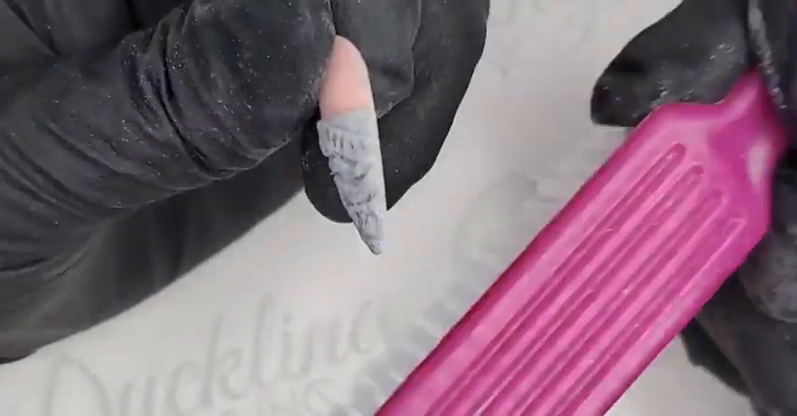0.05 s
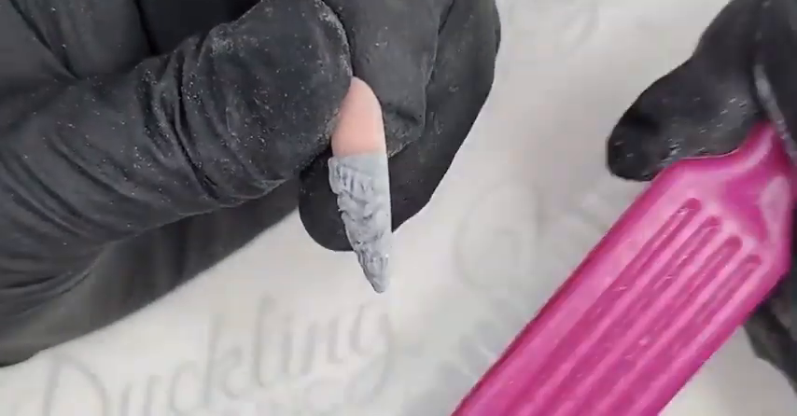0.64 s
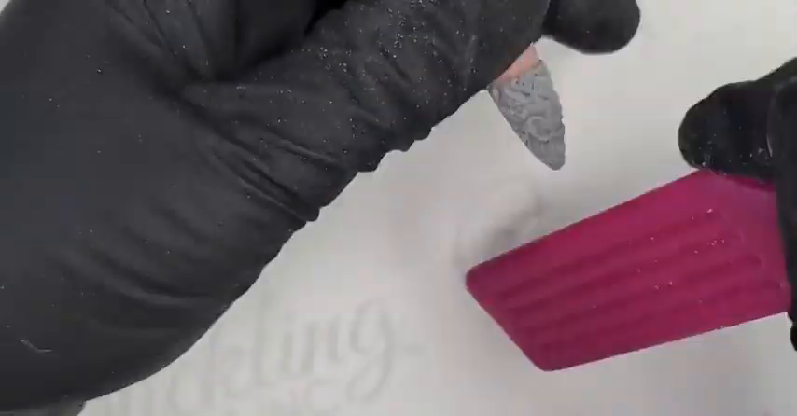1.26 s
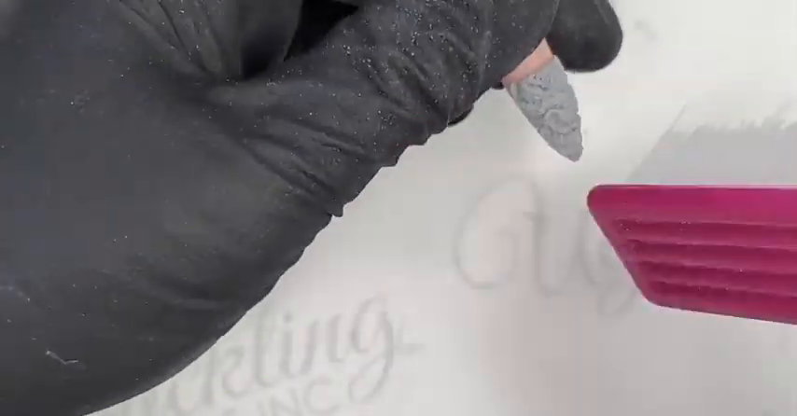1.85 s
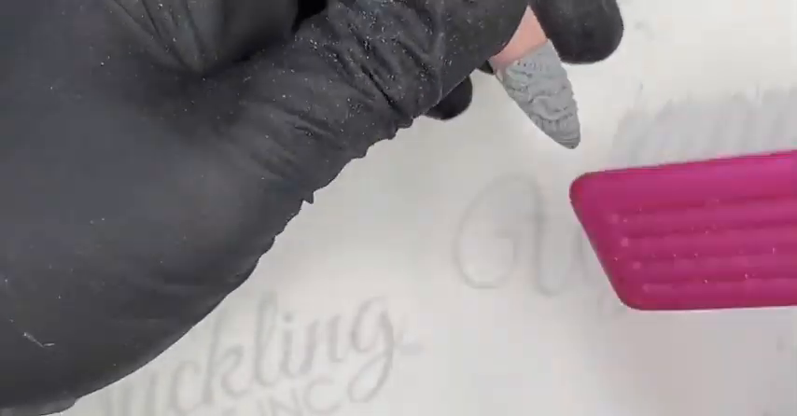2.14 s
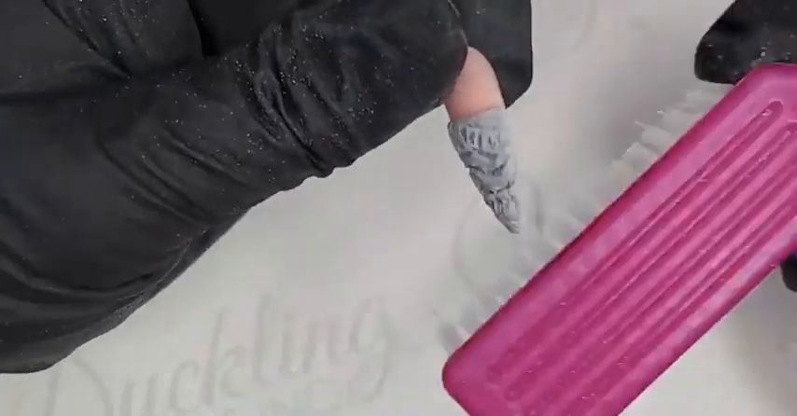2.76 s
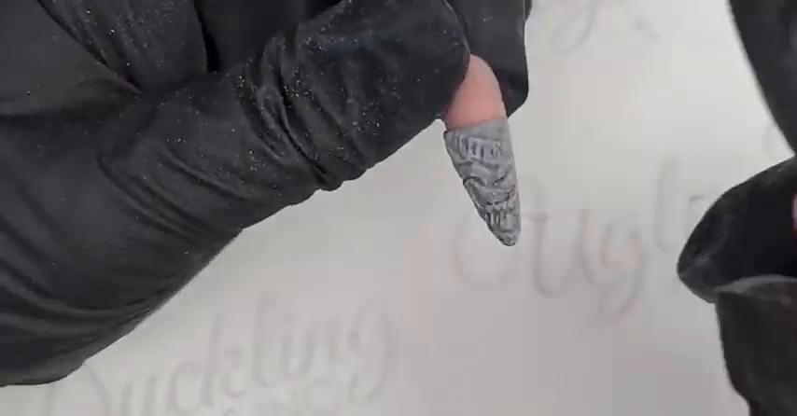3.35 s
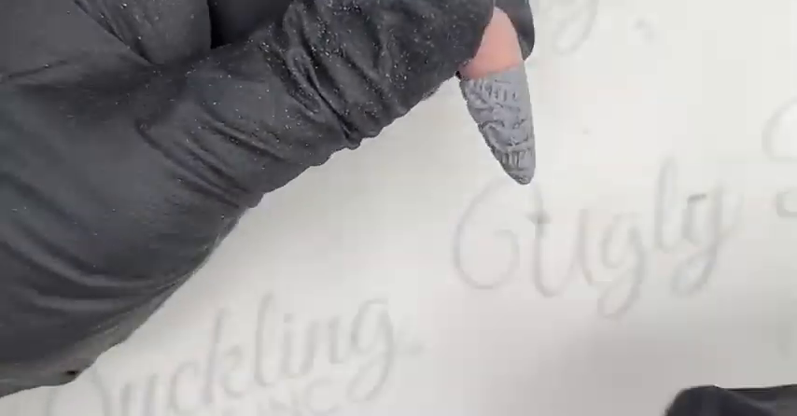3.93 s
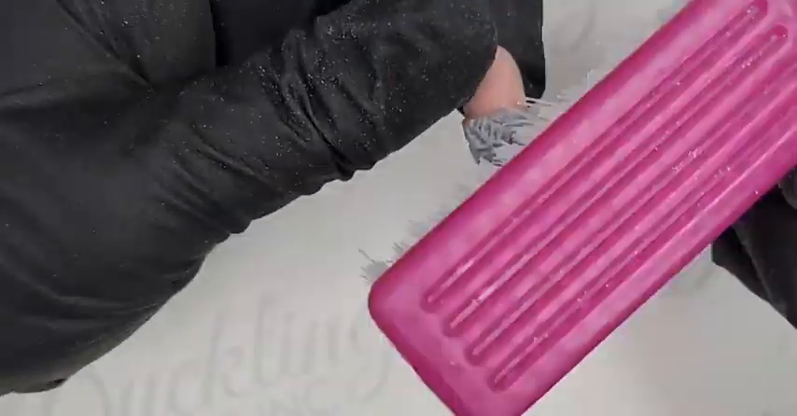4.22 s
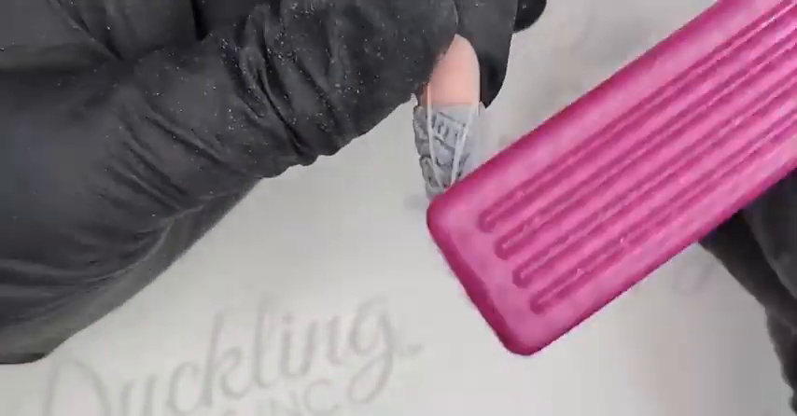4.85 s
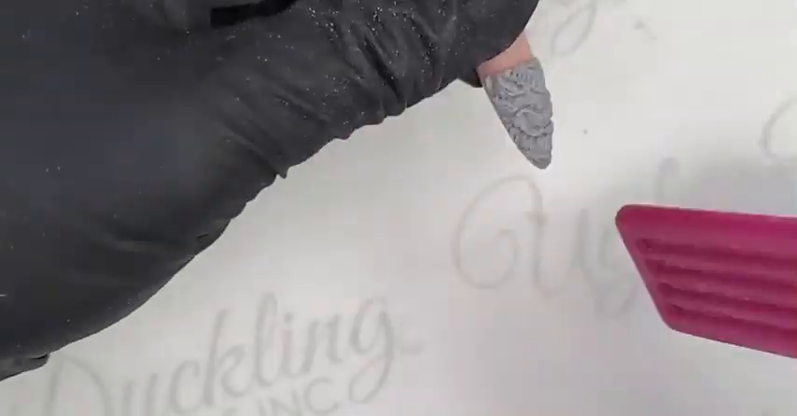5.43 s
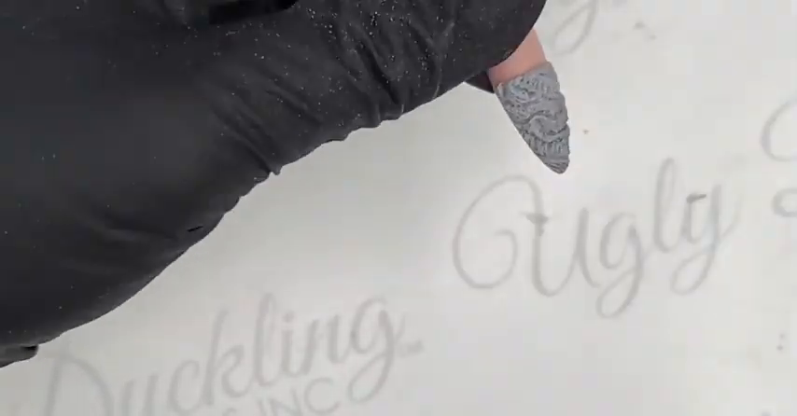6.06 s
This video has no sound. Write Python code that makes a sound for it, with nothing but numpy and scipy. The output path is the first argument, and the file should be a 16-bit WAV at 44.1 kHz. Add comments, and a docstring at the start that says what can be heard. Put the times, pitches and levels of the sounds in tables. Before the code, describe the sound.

A small plastic brush sweeps dust off a nail, close to the microphone in a small room. From the start, short dry swishes come about four a second, each a hiss that swells into a scrape and flicks off. The first few are scratchier, with sharp bristle clicks near 0.6 and 0.9 seconds. From 1.3 to 3 seconds the strokes are thinner and hissier, ending with another click. The brushing then pauses: a rubber glove slips on the handle at about 3.2 seconds, then rubs and crinkles with small pops around 4 seconds. The swishes resume at 4.3 seconds, strongest near 4.6, with a tick just before 5, and continue more lightly until about 6 seconds. Hands bump the desk very softly now and then. A faint low room rumble lies underneath and swells slightly toward the end.

```python
"""Brushing dust off a nail

A gloved hand sweeps filing dust off a long nail with a small plastic brush, close to a microphone
with two openings (ports). In each stroke the bristle tips hiss on, bite harder as they bend, and
flick off the nail's edge. Midway the brush is turned round in the glove, which slides and crinkles.
The hands knock softly on the desk. A small room answers every swish; its rumble swells at the end."""
import sys
import numpy as np
from scipy import signal
from scipy.fft import rfft, irfft, next_fast_len
from scipy.io import wavfile

SR = 44100
rng = np.random.default_rng(int(sys.argv[2]) if len(sys.argv) > 2 else 0)


def log_audio(samples):
    """Write samples as a 16-bit WAV file to the path given in sys.argv[1]."""
    # one column per channel
    frames = np.atleast_2d(samples).T
    # limit to full scale, then quantise
    limited = np.clip(frames, -1, 1)
    pcm = np.round(limited * 32767).astype(np.int16)
    wavfile.write(sys.argv[1], SR, pcm)


N = 268555
TIME = np.arange(N) / SR


def undb(db):
    """Turn decibels into a gain to multiply by."""
    return 10 ** (np.asarray(db) / 20)


def at_hz(points, hz):
    """Read between (freq_hz, value) points, with every octave equally wide."""
    freqs, values = np.transpose(points)
    return np.interp(np.log(np.maximum(hz, 1)), np.log(freqs), values)


def shape(x, points):
    """Turn lows and highs up or down along a (freq_hz, gain_db) curve."""
    size = next_fast_len(2 * x.shape[-1])
    gain = undb(at_hz(points, np.arange(size // 2 + 1) * SR / size))
    return irfft(rfft(x, size) * gain, size)[..., :x.shape[-1]]


def colour(x, points):
    """Like shape, but white noise keeps its power."""
    gain = undb(at_hz(points, np.linspace(0, SR / 2, 2048)))
    return shape(x, points) / np.sqrt(np.mean(gain ** 2))


def wander(turns_per_s):
    """A random drift around zero, roughly between -1 and 1."""
    return np.interp(TIME * turns_per_s, np.arange(N), rng.standard_normal(N))


def bump(peak_s, width_s):
    """A bell-shaped swell that is down to about a third at width_s from its peak."""
    return np.exp(-np.minimum(((TIME - peak_s) / width_s) ** 2, 50))


def surge(peak_s, rise_s, fall_s):
    """A gain that grows to a sharp peak of 1 and dies away again."""
    return np.exp(-np.minimum(np.maximum((peak_s - TIME) / rise_s, (TIME - peak_s) / fall_s), 50))


def slips(per_s, spread_db, flutter_db, flutter_hz):
    """Rubbing surfaces stick and slip, making bunches of tiny uneven clicks; average power is 1."""
    clicks = (rng.random(N) < per_s / SR) * np.sign(rng.standard_normal(N))
    size_db = spread_db * np.clip(rng.standard_normal(N), -2, 2)
    bunch_db = flutter_db * np.clip(wander(flutter_hz), -2, 2)
    clicks *= undb(size_db + bunch_db)
    return clicks / np.std(clicks)


# tone of the room's rumble: freq_hz, gain_db
RUMBLE_TONE = [(20, -7), (40, -7), (65, 9), (110, -9), (175, 3), (300, -9.5), (600, -20.5), (1100, -34),
               (2500, -32), (7000, -79), (11000, -30), (16000, -38.5)]


def rumble(level_db=-65, waver_db=2):
    """A low indoor rumble that wavers, alike at both ports, under a faint hiss."""
    common = rng.standard_normal(N) * undb(waver_db * wander(9.5))
    apart = shape(rng.standard_normal((2, N)), [(60, -11), (250, -5.5), (1500, 9), (8000, 4)])
    together = shape(common, [(300, 0.5), (1500, 1.5), (5000, -11)]) * undb([[-1.2], [1.2]])
    return undb(level_db) * colour(together + apart, RUMBLE_TONE)


# tone of the room's echo: freq_hz, gain_db
ECHO_TONE = [(150, 8), (700, -6.5), (1200, -4.5), (2200, 0.5), (4500, -4), (8000, -2), (11000, -2),
             (16000, 1)]
# time the echo takes to fade by 60 dB: freq_hz, fade_s
ECHO_FADE = [(300, 0.29), (2500, 0.32), (6000, 0.36), (14000, 0.24)]


def room_echo(x, gain_db=-8.5, first_echo_s=.0025):
    """The walls return a short wash of sound, different at each port; the very top fades first."""
    t = np.arange(SR // 2) / SR
    hz, frame_s, spectrum = signal.stft(rng.standard_normal((2, len(t))), SR)
    fade = np.exp(-np.log(1000) * frame_s / at_hz(ECHO_FADE, hz)[:, None])
    tail = signal.istft(spectrum * fade, SR)[1][:, :len(t)]
    tail *= np.clip(t / first_echo_s - 1, 0, 1)
    tail = shape(tail / np.linalg.norm(tail, axis=1, keepdims=True), ECHO_TONE)
    return undb(gain_db) * signal.fftconvolve(x[None], tail, axes=1)[:, :N]


# how much louder the left port hears the nail than the right: freq_hz, balance_db
LEFT_OVER_RIGHT = [(60, 6), (150, -14.5), (400, 5), (1100, -10.5), (1700, -4), (3000, -3.5), (6000, -3),
                   (7800, 14.5), (9000, -7), (10300, -11.5), (12000, -4), (14500, -2), (16000, 18)]


def ports(x):
    """Each microphone port has its own tone: what one gains, the other loses."""
    left = [(hz, -10 * np.log10((1 + undb(-db) ** 2) / 2)) for hz, db in LEFT_OVER_RIGHT]
    right = [(hz, -10 * np.log10((1 + undb(db) ** 2) / 2)) for hz, db in LEFT_OVER_RIGHT]
    return np.array([shape(x[0], left), shape(x[1], right)])


def hand_scatter(x, scatter_s=0.0022, scatter_db=-1, left_delay_s=.000165):
    """Sound reaches the right port first; moving hands and brush bounce its highs along changing paths."""
    hop, taps, lead = 2048, 512, 16  # in samples
    t = (np.arange(taps) - lead) / SR
    direct_path = np.sinc(SR * (t - np.array([[left_delay_s], [0]])))
    fade = np.hanning(2 * hop)
    padded = np.pad(x, (hop, 2 * hop))
    out = np.zeros((2, len(padded) + taps))
    for i in range(0, N + hop, hop):
        paths = rng.standard_normal((2, taps)) * np.exp(-np.abs(t) / scatter_s) * (t > 0)
        paths /= np.linalg.norm(paths, axis=1, keepdims=True)
        # low sounds bend round the hands, so they scatter less
        paths = shape(paths, [(300, -0.5), (1500, 1.5), (4000, 2), (12000, 7.5)])
        piece = padded[None, i:i + 2 * hop]
        direct = signal.fftconvolve(piece * fade, direct_path, axes=1)
        # the square root keeps the power even as unrelated paths blend
        scattered = signal.fftconvolve(piece * np.sqrt(fade), paths, axes=1)
        out[:, i:i + 2 * hop + taps - 1] += direct + undb(scatter_db) * scattered
    return out[:, hop + lead:hop + lead + N] / np.sqrt(1 + undb(scatter_db) ** 2)


# hands knock on the desk; the long last row is the room's rumble swelling towards the end:
# peak_s, level_db, width_s, pitch_hz
LOW_SWELLS = [(0.31, -56, .025, 61), (0.56, -52, 0.011, 152), (1.628, -53, 0.014, 193),
              (1.636, -51, 0.035, 65), (1.831, -53.5, 0.031, 155), (3.218, -53, 0.0089, 64.7),
              (5.215, -54, 0.027, 65.4), (5.432, -50.5, 0.017, 60.5), (5.444, -56.5, 0.034, 166),
              (5.916, -59.5, 0.66, 65.6)]


def knocks_and_rumble_swell(band_ratio=1.36):
    """Swells of low shaking, too damped to ring: short ones are padded knocks, the long one a rumble."""
    out = np.zeros(N)
    for peak_s, level_db, width_s, pitch_hz in LOW_SWELLS:
        band = signal.butter(2, [pitch_hz / band_ratio, pitch_hz * band_ratio], "band", fs=SR, output="sos")
        shake = signal.sosfilt(band, rng.standard_normal(N))
        swell = bump(peak_s, width_s)
        shake_power = np.sum(swell * shake ** 2) / swell.sum()
        out += undb(level_db) * shake * np.sqrt(swell / shake_power)
    return out


# the glove tightens round the handle: peak_s, level_db, fall_s
GRIPS = [(1.206, -63.5, .015), (3.925, -47, 0.0029), (4.095, -46.5, 0.042)]
# folds of the glove pop over: peak_s, level_db, width_s
FOLD_POPS = [(4.021, -56, 0.0014), (4.069, -36, 0.00077), (4.142, -33, 0.0018)]
# tone of squeezed rubber: freq_hz, gain_db
SQUEEZE_TONE = [(200, -3), (700, -7.5), (1300, -20.5), (1900, 1.5), (2700, -0.5), (3700, -7.5),
                (7000, -20.5), (11000, -17.5), (16000, -22)]


def glove_squeeze(rise_ratio=1.47):
    """The fingers tighten on the handle: the rubber crinkles and its folds pop."""
    strain = sum(undb(db) * surge(peak_s, rise_ratio * fall_s, fall_s) for peak_s, db, fall_s in GRIPS)
    pops = sum(undb(db) * np.sqrt(bump(peak_s, width_s)) for peak_s, db, width_s in FOLD_POPS)
    crinkle = slips(per_s=7000, spread_db=3.5, flutter_db=1.8, flutter_hz=200)
    return colour((strain + pops) * crinkle, SQUEEZE_TONE)


# first the faint fading tail of an earlier brush stroke, then the handle slipping through the glove:
# peak_s, level_db, fall_s
SOFT_RUBS = [(.015, -64, 0.087), (1.25, -67.5, 0.097), (3.08, -56.5, 0.033), (3.216, -38.5, 0.016),
             (3.304, -52.5, 0.11), (3.558, -63, 0.024), (3.922, -44.5, 0.024)]
# tone of these rubs: freq_hz, gain_db
RUB_TONE = [(200, -10.5), (600, -3), (1200, -10), (2000, 0), (4200, 1.5), (6500, -8), (8500, -10.5),
            (11000, -6), (16000, -13)]


def soft_rubbing(rise_ratio=0.94, rest_db=-74.5, swing_db=-64.5, lead_s=0.0082):
    """A stroke's tail fades; thin rubber slides on the handle and rustles, more so with each stroke."""
    rub_power = sum((undb(db) * surge(peak_s, rise_ratio * fall_s, fall_s)) ** 2
                    for peak_s, db, fall_s in SOFT_RUBS)
    swings = sum(bump(flick_s - lead_s, width_s=0.043) for flick_s, *_ in BRUSH_STROKES)
    movement = np.sqrt(undb(rest_db) ** 2 + undb(swing_db) ** 2 * swings)
    rub = np.sqrt(rub_power) * slips(per_s=12000, spread_db=3.5, flutter_db=1.3, flutter_hz=150)
    rustle = movement * slips(per_s=6000, spread_db=3.5, flutter_db=1.8, flutter_hz=40)
    return (undb(0.5) * colour(rub, RUB_TONE)
            + undb(-5) * colour(rustle, HISS_TONE)
            + undb(-15) * colour(rustle, SCRAPE_TONE))


# mostly single bristles snapping free; at 3.0027 s a quick bright echo of the click just before,
# and at 3.221 s a bright tick as the glove slips on the handle (levels before the boosts below):
# start_s, level_db, extra_treble_db
SHARP_CLICKS = [(0.0836, -44.5, 8.5), (0.603, -25.5, -20), (0.8609, -33, -24), (2.494, -49.5, -16),
                (2.9955, -28, -11), (3.0027, -51, 14.5), (3.221, -47, 10), (4.692, -42, -24),
                (4.947, -34, 3)]
# tone of a snapping bristle: freq_hz, gain_db
SNAP_TONE = [(50, -31), (150, 9.5), (400, -12), (800, 4), (1500, 2.5), (2500, 4), (4500, 3.5), (7000, -1.5),
             (10000, -18), (16000, -47)]


def sharp_clicks(crack_boost_db=19, treble_boost_db=18, rattle_s=.0009, rattle_db=-2):
    """Each click is one sharp spike followed by about a millisecond of rattle."""
    t = np.arange(256) / SR
    cracks, treble = np.zeros((2, N))
    for start_s, level_db, extra_treble_db in SHARP_CLICKS:
        rattle = rng.standard_normal(len(t)) * np.exp(-t / rattle_s)
        crack = undb(level_db) * ((t == 0) + undb(rattle_db) * rattle / np.linalg.norm(rattle))
        i = int(start_s * SR)
        cracks[i:i + len(t)] += crack
        treble[i:i + len(t)] += crack * undb(extra_treble_db)
    return (undb(crack_boost_db) * colour(cracks, SNAP_TONE)
            + undb(treble_boost_db) * colour(treble, HISS_TONE))


def stroke_power(flick_s, drag_s, level_db, swell_db, bite_db, flick_db):
    """The rubbing power of one stroke, which swells until the bristles flick off the edge."""
    start_s = flick_s - drag_s
    lift_s = flick_s + 0.01 * 2 ** (bite_db / 8.5)  # a harder bite stays longer on the nail
    times, levels_db = zip((start_s, -swell_db - 10.5),  # the tips touch
                           (start_s + 0.015, -swell_db),  # the drag begins
                           (flick_s, 0),
                           (lift_s, -9),  # the pressure has eased
                           (lift_s + 0.02, -35))  # the brush is off
    pressure = undb(np.interp(TIME, times, levels_db, left=-np.inf, right=-np.inf))
    flick = undb(flick_db) ** 2 * bump(flick_s, width_s=0.0029)
    return undb(level_db) ** 2 * (pressure ** 2 + flick)


# sweeps of the brush: flick_s, drag_s, level_db, swell_db, bite_db, flick_db
# bite favours scrape over hiss: low for a glancing stroke, high for one square on the nail
BRUSH_STROKES = [(.113, 0.063, -49.5, -0.5, 7.5, -1), (0.347, .062, -39, 12, 7, -11),
                 (0.602, 0.053, -38.5, 17.5, 9.5, -1.5), (0.892, 0.067, -39, 20, 5.5, -15.5),
                 (1.33, 0.06, -47, 4.5, 0, -10), (1.609, 0.083, -44.5, 7.5, -2.5, 2),
                 (1.856, 0.075, -42, 13, -5.5, 9.5), (2.1, 0.085, -41.5, 15.5, -2, 4.5),
                 (2.324, .052, -43.5, 5, -1, -14), (2.407, 0.046, -49.5, 10, 1, -4),
                 (2.558, .073, -42.5, 10.5, -2.5, -4), (2.77, 0.046, -44.5, 2, 0, -3.5),
                 (2.988, .052, -41.5, 3.5, 0, 2.5), (4.335, 0.064, -41, 2, -.5, 4),
                 (4.566, 0.065, -34, 6, 3, 8), (4.782, 0.063, -39, 7.5, 6.5, -5),
                 (4.938, 0.036, -44, 1, 4.5, -19), (5.274, 0.085, -43.5, 6, -2, -1.5),
                 (5.478, 0.055, -46, 3.5, -1, 1), (5.699, 0.053, -46.5, 1.5, -4.5, 5),
                 (5.902, .056, -41, 7.5, -3, -19)]
# tufts spread as they touch nail or glove: peak_s, level_db, width_s
TUFT_LANDINGS = [(0.862, -38.5, 0.012), (1.549, -38.5, 0.0015), (2.044, -41, 0.0029), (4.14, -50.5, 0.0059),
                 (4.294, -63, 0.0019), (4.478, -47, 0.0097), (4.541, -30, .005), (4.707, -50, 0.011),
                 (4.753, -46, 0.0026), (5.415, -53.5, .005), (5.442, -34.5, 0.0021)]
# tones of the hissing tips, the scraping bristles and the hollow nail and handle: freq_hz, gain_db
HISS_TONE = [(1500, -60), (4000, -19), (8000, -4.5), (10500, 2.5), (12500, -2), (16000, -3.5)]
SCRAPE_TONE = [(900, -23.5), (1300, -7.5), (2000, 1.5), (2600, -3), (3300, -1), (4400, 3.5), (6500, -4.5),
               (8000, -7.5), (11000, -7), (16000, -9)]
BODY_TONE = [(25, -24.5), (60, -14), (170, -1.5), (330, 0.5), (520, 3.5), (700, 7), (1050, -6.5),
             (1800, -10), (4000, -19.5)]


def brush(unbent_db=-5, landing_scrape_db=-8, body_db=-11.5, body_per_bite=1.2048):
    """Tips hiss from first touch; as the bristles bend they scrape harder and shake nail and handle."""
    hiss_power, scrape_power, body_power = np.zeros((3, N))
    for flick_s, drag_s, level_db, swell_db, bite_db, flick_db in BRUSH_STROKES:
        power = stroke_power(flick_s, drag_s, level_db, swell_db, bite_db, flick_db)
        bend_db = np.interp(TIME, [flick_s - drag_s, flick_s], [unbent_db, 0])
        hiss_power += power
        scrape_power += power * undb(bend_db + bite_db) ** 2
        body_power += power * undb(bend_db + body_db + body_per_bite * bite_db) ** 2
    for peak_s, level_db, width_s in TUFT_LANDINGS:
        hiss_power += undb(level_db) ** 2 * bump(peak_s, width_s)
        scrape_power += undb(level_db + landing_scrape_db) ** 2 * bump(peak_s, width_s)
    # hundreds of bristles slip at once; whole tufts catch and let go on the nail's carved pattern
    catch = undb(.7 * wander(220))
    fine = catch * slips(per_s=30000, spread_db=3, flutter_db=.8, flutter_hz=700)
    coarse = catch * slips(per_s=16000, spread_db=3.5, flutter_db=.8, flutter_hz=500)
    shaking = catch * slips(per_s=5000, spread_db=3, flutter_db=1.5, flutter_hz=200)
    stray_ticks = slips(per_s=300, spread_db=3, flutter_db=.8, flutter_hz=200)
    return (undb(-2.5) * colour(fine * np.sqrt(hiss_power), HISS_TONE)
            + undb(-10) * colour(stray_ticks * np.sqrt(scrape_power), SNAP_TONE)
            + undb(-2.52) * colour(coarse * np.sqrt(scrape_power), SCRAPE_TONE)
            + undb(2.4) * colour(shaking * np.sqrt(body_power), BODY_TONE))


def scene():
    """Brush and gloves work close to the microphone, over the desk, in the room's rumble."""
    brushing = brush() + sharp_clicks() + soft_rubbing()
    squeeze = glove_squeeze()
    close = ports(hand_scatter(brushing + squeeze) + knocks_and_rumble_swell())
    echo = room_echo(brushing + undb(-3.5) * squeeze)  # the closed hand shields the squeeze
    return close + echo + rumble()


def record(dry, top_hz=15900):
    """A steep filter cuts off the very highest sounds."""
    return signal.sosfilt(signal.ellip(10, .2, 70, top_hz, fs=SR, output="sos"), dry)


dry = scene()
out = record(dry)
log_audio(out)
```